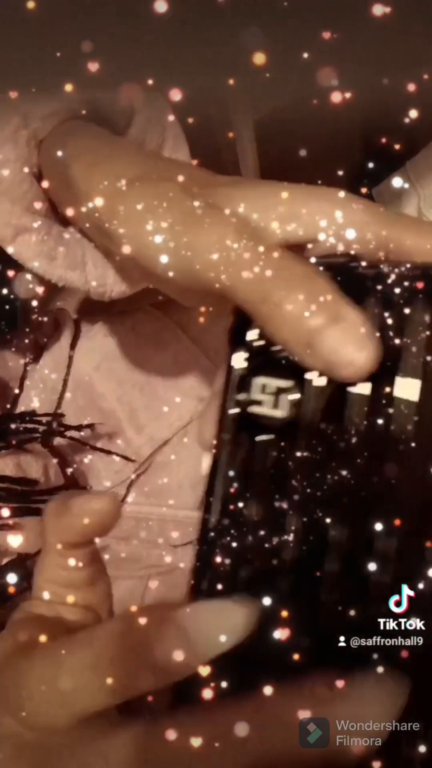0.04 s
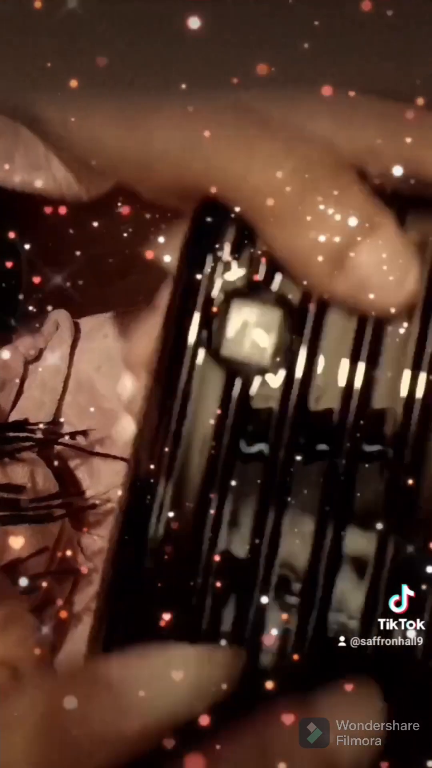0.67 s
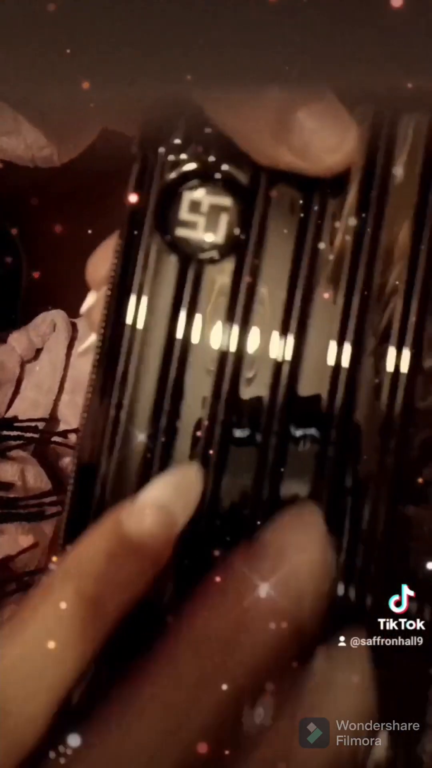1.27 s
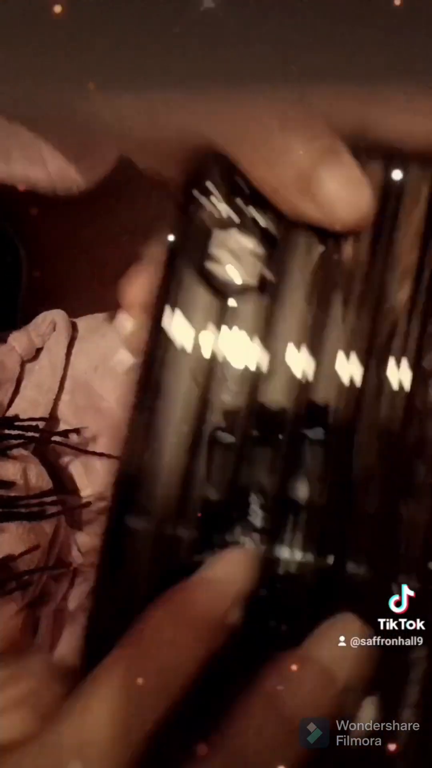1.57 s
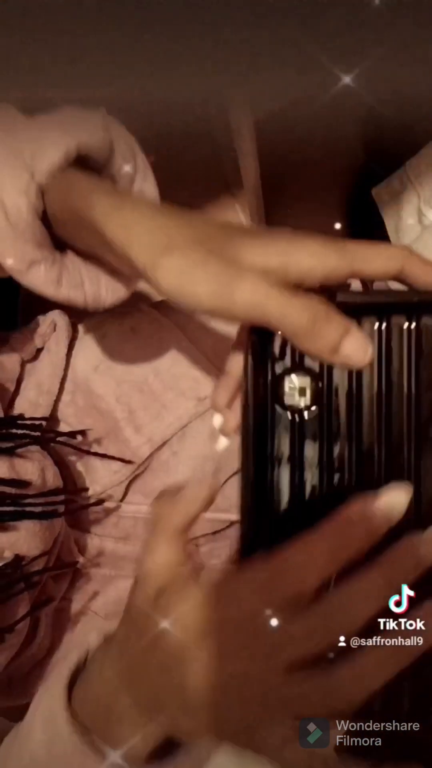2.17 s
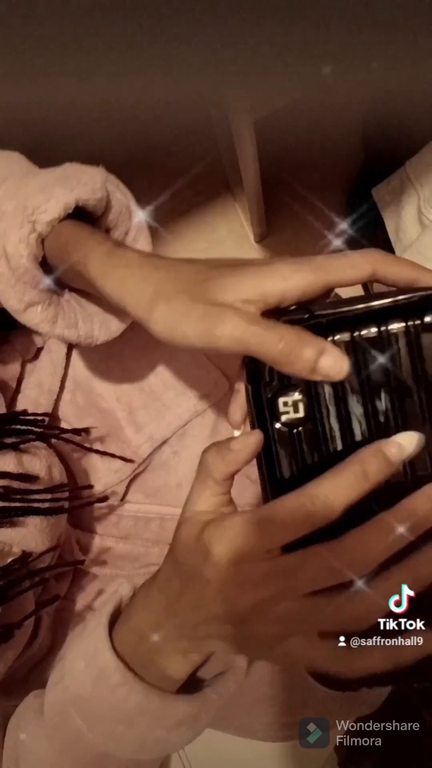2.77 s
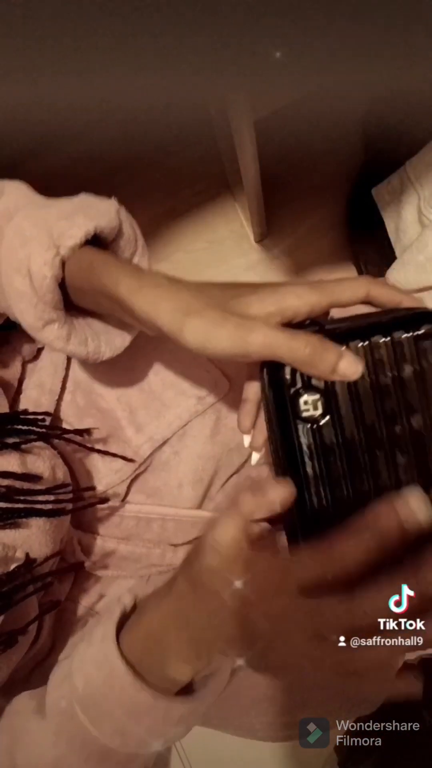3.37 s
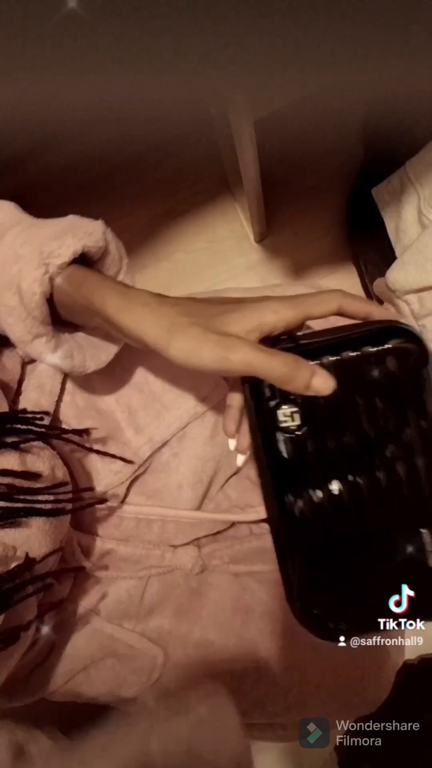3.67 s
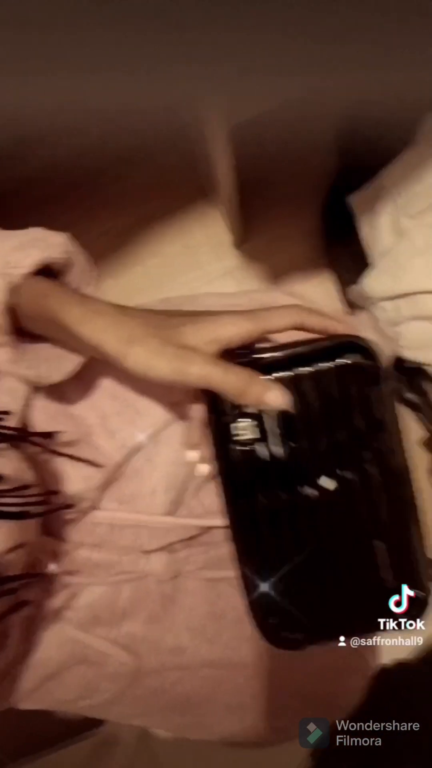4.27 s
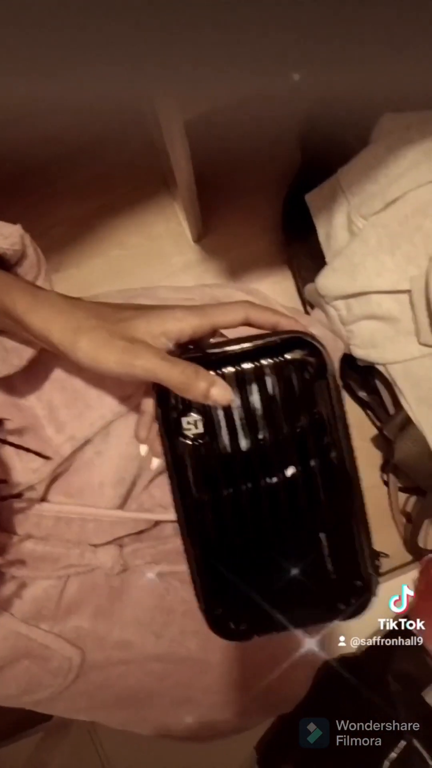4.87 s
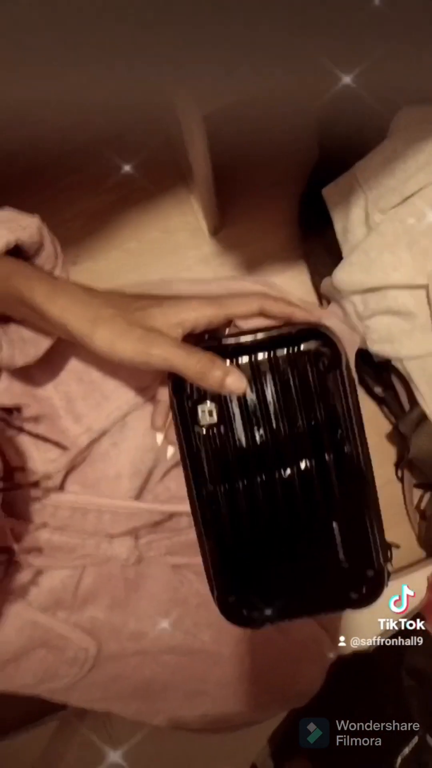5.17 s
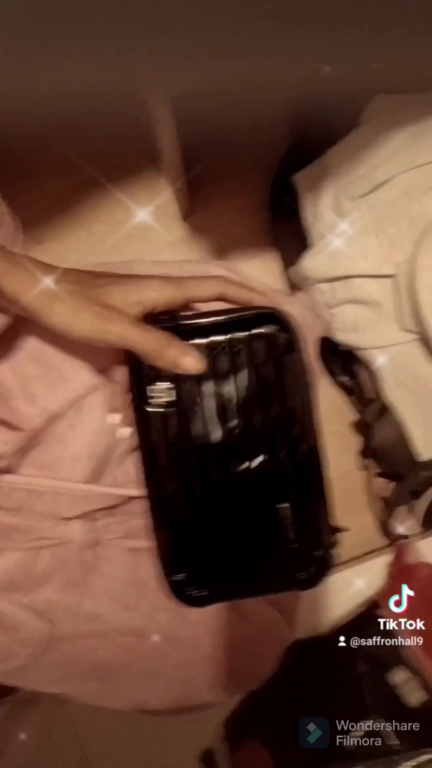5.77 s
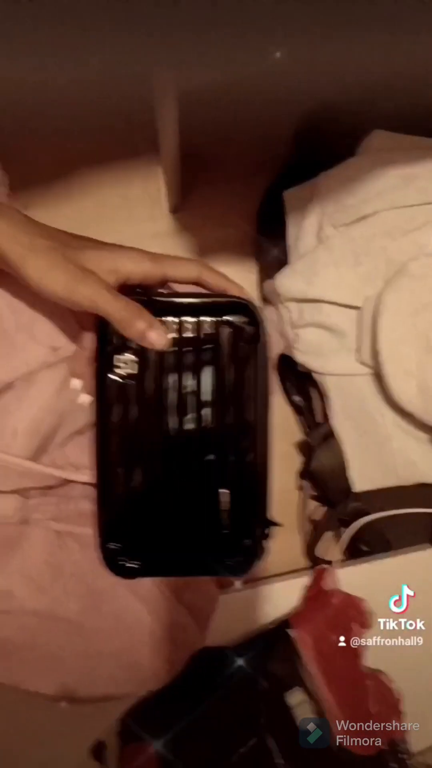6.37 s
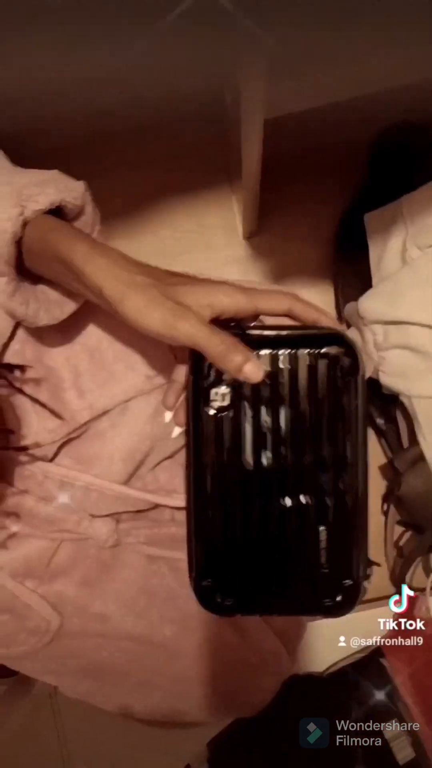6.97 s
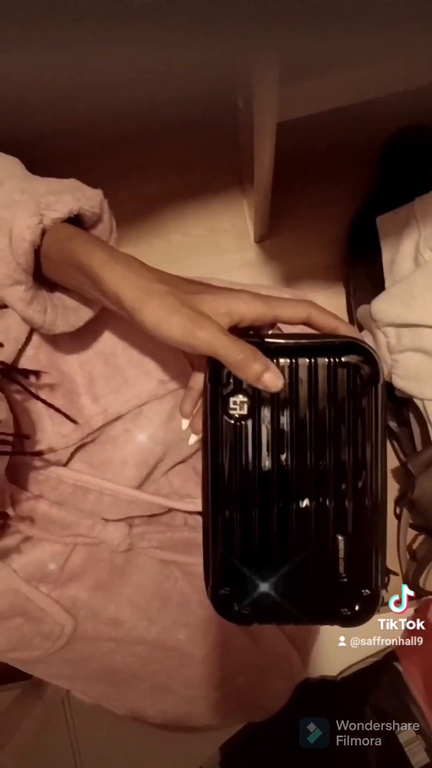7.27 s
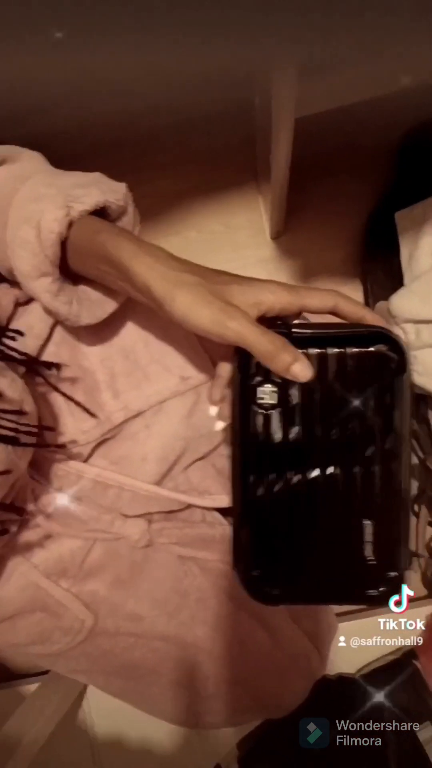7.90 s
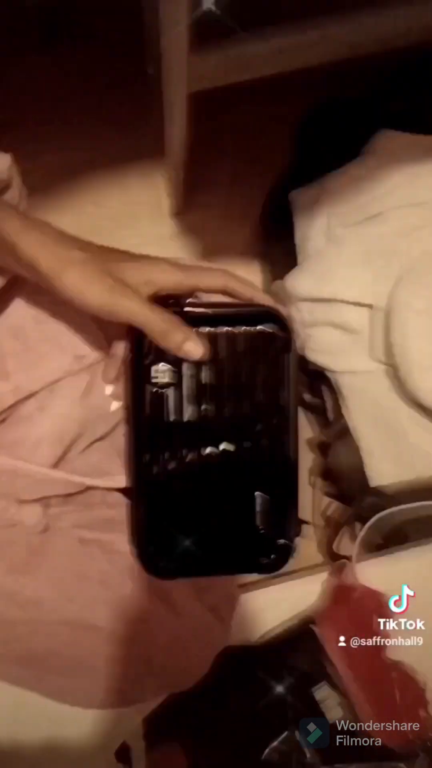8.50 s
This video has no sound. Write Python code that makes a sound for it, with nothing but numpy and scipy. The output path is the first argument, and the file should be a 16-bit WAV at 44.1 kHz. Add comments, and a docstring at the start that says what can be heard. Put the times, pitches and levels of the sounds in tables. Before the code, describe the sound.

Long fingernails tap sharply on a small ribbed plastic case, then it knocks, rubs and creaks in the hand as fabric swishes.

```python
"""Close to a phone in a small, soft room, long fingernails tap the ribbed lid of a small hard plastic case
while skin brushes over it. Each impact excites a thump of the cavity, a clack of the shell and a click.
After four seconds one hand shifts its grip: the case knocks, rubs and creaks by stick-slip friction,
and a fingertip squeaks once. At eight seconds fabric swishes past, and a few last knocks follow.
Throughout, the handling sends a dull rumble through the body of the phone."""
import sys
import numpy as np
from scipy import signal
from scipy.fft import rfft, irfft
from scipy.io import wavfile
from scipy.ndimage import uniform_filter1d

SR = 44100
rng = np.random.default_rng(int(sys.argv[2]) if len(sys.argv) > 2 else 0)


def put_to_file(sound):
    """Save the sound as 16-bit audio at rate SR, in the file named by the first command-line argument."""
    columns = np.atleast_2d(sound).T  # one column per channel
    safe = np.clip(columns, -1, 1)
    whole_steps = np.round(safe * 32767)
    wavfile.write(sys.argv[1], SR, whole_steps.astype(np.int16))


N = 381024
TIME = np.arange(N) / SR
HIT_SIZE = 8192  # samples in one impulse response
THUMP_TOP_HZ, CLACK_TOP_HZ, TOP_HZ = 900, 4500, 15600

# Spectrum of the background. Each row: frequency in Hz, relative level in dB.
AIR_SPECTRUM = [(15, -30.5), (25, 2), (903, -15), (1180, -17), (2700, -19.5), (3180, -21), (3930, -18.5),
                (7480, -24.5), (8550, -20.5), (15000, -35.5)]
# Resonances heard in each hit: low and middle case modes, plus two high rings near 8.6 and 10.1 kHz.
# Each row: frequency in Hz, bandwidth in Hz, relative peak in dB.
RESONANCES = [(208, 89, -3.5), (282, 31, 9), (359, 40, 1.5), (450.8, 23, 6.5), (729, 120, 4),
              (1050, 89, 0.5), (1920, 84, -10.5), (2270, 350, -8), (3460, 39, -0.5), (6160, 220, -5.5),
              (8590, 340, 3), (10140, 370, 0)]
# Reverberation of the room. Each row: frequency in Hz, time to decay by 60 dB in seconds.
ROOM_DECAY = [(150, 0.24), (400, 0.067), (1100, 0.084), (2800, 0.11), (7000, 0.11), (14000, 0.08)]
# Spectra of skin friction, phone rumble, taps, knocks and cloth friction.
# Each row: frequency in Hz, relative level at the left and at the right in dB.
RUB_SPECTRUM = [(30, -18, -23.5), (120, -11.5, -12), (184, -1.5, -7), (285, -2, -10.5), (405, -11.5, -6),
                (534, -19, -15), (1190, -18.5, -22), (2200, -21.5, -17), (3554, -19.5, -24),
                (5874, -20, -20), (8817, -13.5, -21), (10700, -20.5, -16), (12500, -23, -27.5),
                (15000, -32, -35.5)]
RUMBLE_SPECTRUM = [(20.6, -12, -10.5), (40, -6.5, -6.5), (67, -2.5, -3.5), (111, -7, -13),
                   (166, -20, -18.5), (402, -47.5, -46), (1500, -79.5, -80.5)]
TAP_SPECTRUM = [(60, -26.5, -17.5), (120, -27.5, -16.5), (195, -7, -6), (403, -8, -9), (800, -7.5, -5),
                (1280, -11, -13), (2480, -8, -7), (3500, -6.5, -8.5), (6850, -3.5, -1.5),
                (7200, -0.5, -10.5), (9000, 1, -6), (10200, -8, 4), (11600, -13.5, -1.5),
                (14500, -17.5, -20.5)]
KNOCK_SPECTRUM = [(40, -3, -5), (154, -1, -4.5), (278, -0.5, -3), (650, -3, -4), (860, -16.5, -41),
                  (1340, -10.5, -10), (1810, -13, -23.5), (2600, -14.5, -12), (3200, -10.5, -10),
                  (3980, -18, -6), (5890, -21.5, -27.5), (8540, -18, -17.5), (11060, -27.5, -21.5),
                  (15700, -41.5, -37)]
CLOTH_SPECTRUM = [(101, -9, -9.5), (356, 6, -7), (593, -11.5, -12.5), (710, 1.5, -14), (1080, -3.5, -20.5),
                  (1950, 14, -7), (3500, -1, -15.5), (6220, -13.5, -25), (8900, -3.5, -23),
                  (9840, -10.5, -18), (12440, -18, -33), (15000, -25, -34)]
# Mostly skin sliding on the case. The row at 7.66 s is a low hum dying away after the loud knock at 7.57 s.
# Each row: start and length in seconds, rumble and hiss in dB before trim.
RUBS_AND_HUM = [(.08, 0.016, -67, -64.5), (.35, .07, -62, -63), (.64, 0.025, -66, -54.5),
                (.84, 0.08, -58, -56.5), (1.04, 0.089, -62, -69), (1.27, 0.1, -64, -67),
                (2.85, 0.038, -87, -58.5), (3.5, 0.094, -66, -67), (3.7, 0.031, -63, -49),
                (3.822, 0.039, -70, -60), (3.87, 0.13, -82, -71), (4.03, 0.03, -76, -49.5),
                (4.08, 0.18, -80, -64.5), (4.24, 0.014, -47, -47), (4.29, 0.13, -64, -69.5),
                (4.465, 0.037, -56, -64), (4.6, 0.21, -47.5, -65.5), (4.86, .14, -50.5, -70),
                (5.16, 0.033, -43, -75), (5.27, 0.052, -34.5, -47), (5.655, 0.11, -46.5, -63.5),
                (5.81, .23, -58.5, -69.5), (6.06, 0.22, -46.5, -63.5), (6.17, .17, -47.5, -63),
                (6.37, .11, -39.5, -51), (6.49, 0.12, -48.5, -81), (6.745, 0.054, -47.5, -66),
                (6.93, .18, -56.5, -63.5), (7.335, 0.06, -57.5, -84), (7.49, 0.036, -74, -69),
                (7.57, 0.072, -48.5, -58.5), (7.66, .12, -68, -85)]
# Placement of those sounds. Each row: time in seconds, left minus right in dB.
RUB_BALANCE = [(0, -6.5), (3.4, 1), (3.8, 2.5), (4.2, 12), (4.7, 7.5), (5.3, 0.5), (6.0, 6), (6.7, 8),
               (7.7, 5.5)]
# The hand steadies and regrips the phone. Each row: start and length in seconds, level in dB.
PHONE_GRIPS = [(.12, 1.6, -71), (2.35, 1.6, -71.5), (4.035, .09, -55), (4.2, .55, -59)]
# Nails and fingertips on the lid. Each row: start in seconds, thump, clack and click in dB before trim, thump
# and clack frequencies in Hz, left minus right in dB.
NAIL_TOUCHES = [(.1905, -27.5, -28.5, -23.5, 463, 2090, 0.5), (0.315, -39, -58, -60.5, 212, 970, -7),
                (0.3432, -56.5, -54, -57, 426, 2600, 4), (0.365, -57, -53.5, -84, 805, 2610, -2),
                (0.3969, -56, -52.5, -48, 550, 2580, 5), (0.527, -42.5, -59.5, -64.5, 176, 980, -2.5),
                (0.645, -58.5, -53.5, -53.5, 171, 2570, 11), (0.6715, -55.5, -59.5, -72, 462, 2360, -7),
                (.882, -65.5, -57, -49.5, 457, 2330, 3), (0.9199, -36, -30, -21, 600, 2070, -3),
                (1.0225, -77, -54.5, -55.5, 486, 2060, 6), (1.158, -31.5, -31, -23, 670, 2600, -3),
                (1.334, -36, -29.5, -21.5, 651, 2130, -5), (1.0875, -72.5, -62.5, -56, 320, 2070, 4.5),
                (1.409, -67.5, -59, -55.5, 413, 2120, -4.5),
                (1.5682, -33.5, -31.5, -22.5, 760, 3910, -3.5), (1.706, -34.5, -31.5, -22, 347, 1970, -3),
                (2.0068, -33.5, -31.5, -18.5, 339, 3360, -1), (2.2353, -33.5, -28.5, -24, 352, 2320, -0.5),
                (2.299, -49, -39, -44, 800, 2880, -0.5), (2.3564, -56, -39, -38, 203.4, 3000, 1.5),
                (2.3833, -36, -32, -19, 334, 2650, -1.5), (2.627, -38, -31.5, -24, 191.5, 1654, 0.5),
                (2.7334, -71.5, -48, -43.5, 180, 3980, 0.5), (2.8056, -39.5, -30, -20, 340, 1490, -3.5),
                (3.0769, -41.5, -33.5, -21, 342, 1030, -1), (3.212, -41.5, -31, -20, 303, 2024, -1.5),
                (3.3801, -89.5, -85, -61, 165, 4250, 14.5), (3.7283, -57, -52, -45.5, 440, 970, 3),
                (3.881, -64, -72, -54, 230, 3900, 8.5)]
# Knocks of the gripped case. Each row: start in seconds, thump, clack and click in dB before trim,
# thump frequency in Hz, left minus right in dB.
CASE_KNOCKS = [(4.221, -46, -50.5, -44.5, 754, 16), (4.2501, -37.5, -51.5, -46.5, 287, 11),
               (4.1768, -72, -76, -53.5, 291, 28), (4.4515, -57.5, -57, -48.5, 704, 2),
               (4.704, -31.5, -42, -43.5, 307, 7), (4.7172, -35.5, -30, -28.5, 412, -0.5),
               (4.767, -45, -45, -35, 385, 12), (4.7721, -36, -28.5, -33.5, 280, 0),
               (4.8645, -44, -32.5, -49.5, 203, 2), (4.926, -63, -46, -84, 420, 12),
               (4.957, -31, -41, -46, 303, 6), (4.9906, -44.5, -49.5, -90, 390, 11),
               (5.0058, -58, -50.5, -38, 494, -3.5), (5.273, -37, -40.5, -49, 254, 6),
               (5.2942, -41, -22.5, -27.5, 272, 4.5), (5.32, -37.5, -55, -63, 285.7, 21),
               (5.656, -36.5, -55.5, -58, 280, 8.5), (5.719, -39, -31, -38, 273, 5),
               (5.8278, -60, -49, -48.5, 249, 6), (5.948, -48.5, -57.5, -45, 290, -3),
               (6.056, -37, -37, -41, 280, 8), (6.1831, -36.5, -46, -49.5, 300, 13),
               (6.3598, -31, -39.5, -40, 357, 6), (6.4365, -43, -32, -40, 347, 28),
               (6.4461, -33, -36, -37.5, 322, 4), (6.4768, -33.5, -38.5, -48, 270, 7),
               (6.739, -38.5, -68, -84, 398, -5.5), (6.7529, -51, -51, -93, 208, 16),
               (6.921, -40.5, -54.5, -62, 440, -6), (6.9458, -53, -49.5, -57.5, 257, 1),
               (7.227, -52.5, -84.5, -71, 279, 3), (7.331, -43, -86, -92, 407, 0),
               (7.5354, -53.5, -51, -48.5, 309, 8), (7.5573, -27, -39, -36, 316, 7),
               (7.5691, -26, -37.5, -32.5, 270, -1.5), (8.5219, -48, -52, -71, 706, 25),
               (8.595, -30.5, -28.5, -31.5, 246, 7.5), (8.633, -34.5, -35, -36, 286, -3)]
# Runs of stick-slip jerks. Each row: start in seconds, number of jerks, first period in seconds, ratio of
# each period to the last, mid-run thump, clack and click in dB before trim, thump frequency in Hz,
# left minus right in dB.
CREAK_RUNS = [(4.587, 5, 0.034, 0.72, -43.5, -54, -58, 780, 21.5),
              (5.1426, 3, 0.02, 1.1, -47, -35.5, -66, 394, 6.5),
              (5.814, 3, .029, 1.25, -42, -59.5, -68.5, 298, 16),
              (5.971, 2, 0.044, 1, -42, -58.5, -72, 260, 13),
              (6.222, 4, 0.027, 0.75, -43.5, -64.5, -69, 279, 6),
              (6.511, 4, 0.025, 0.92, -41, -69, -74, 300, 2)]
# Fabric brushing by. Each row: start and length in seconds, rumble and hiss in dB before trim.
CLOTH_STROKES = [(8.025, 0.052, -71.5, -62), (8.1, 0.098, -68, -68), (8.155, 0.043, -47.5, -48),
                 (8.26, 0.1, -47, -50), (8.315, 0.047, -40, -43), (8.398, 0.067, -46.5, -39.5),
                 (8.445, 0.05, -37.5, -66), (8.595, 0.055, -40, -41.5)]


def undb(db):
    """Decibels to amplitude ratio."""
    return 10 ** (np.asarray(db) / 20)


def unit(x):
    """Normalisation to an rms of 1."""
    return x / np.sqrt(np.mean(x ** 2))


def sides(pan_db):
    """Constant-power panning: left and right gains that differ by pan_db."""
    gains = undb(np.array([pan_db, -pan_db]) / 2).reshape(2, -1)
    return gains / np.sqrt(np.mean(gains ** 2, axis=0))


def add(out, x, s):
    """Superposition: add x to out, starting at s seconds."""
    i = max(0, int(round(s * SR)))
    out[:, i:i + x.shape[1]] += x[:, :max(0, N - i)]


def response(points, size):
    """Minimum-phase response through (Hz, dB, ..) points, one row for each dB column."""
    hz, *columns = np.transpose(points)
    f = np.maximum(np.fft.rfftfreq(size, 1 / SR), 1)
    cepstrum = irfft(np.log(undb([np.interp(np.log(f), np.log(hz), c) for c in columns])), size)
    cepstrum[:, 1:size // 2] *= 2  # folding onto positive time makes the filter causal
    cepstrum[:, size // 2 + 1:] = 0
    return np.exp(rfft(cepstrum))


def coloured_noise(spectrum):
    """Spectral shaping of white noise, independent at each side, to an rms of 1."""
    return unit(irfft(rfft(rng.standard_normal((2, N))) * response(spectrum, N), N))


def air(level_db):
    """The noise floor: faint, steady room rumble and microphone hiss."""
    return undb(level_db) * coloured_noise(AIR_SPECTRUM)


def resonance(size, hz, width_hz):
    """Frequency response of a damped oscillator, with gain 1 at its centre."""
    f = np.maximum(np.fft.rfftfreq(size, 1 / SR), 1)
    return 1 / (1 + 1j * hz / width_hz * (f / hz - hz / f))


def ringing(size, ring_db):
    """Superposition of the direct push, the low and middle case modes and two high rings."""
    return 1 + sum(undb(db + ring_db) * resonance(size, hz, width) for hz, width, db in RESONANCES)


def spot(size, spread_db, count=90):
    """Modal coupling depends on position: each spot favours a random set of the higher modes."""
    hz = np.linspace(np.sqrt(THUMP_TOP_HZ / 2), np.sqrt(TOP_HZ), count) ** 2
    db = spread_db * np.clip(rng.standard_normal(count), -2, 2)
    db[0] = 0
    return response(np.column_stack([hz, db]), size)


def registers(x):
    """Band splitting into the lows of the cavity, the mids of the shell and the treble of the contact."""
    bands = [(THUMP_TOP_HZ, "low"), ([THUMP_TOP_HZ, CLACK_TOP_HZ], "band"), (CLACK_TOP_HZ, "high")]
    return [signal.sosfilt(signal.butter(3, hz, kind, fs=SR, output="sos"), x) for hz, kind in bands]


def wander(rate_hz):
    """Smoothing turns white noise into a slow fluctuation with an rms of 1."""
    width = int(SR / rate_hz)
    return unit(uniform_filter1d(uniform_filter1d(rng.standard_normal(N), width), width))


def friction(slips_per_s, spread_db, smooth_db, flutter_db, spot_db, size=4096):
    """Sliding friction: tiny random slips and fibre noise, under a pressure that flutters and moves."""
    slips = (rng.random(N) < slips_per_s / SR) * rng.standard_normal(N)
    slips *= undb(spread_db * np.minimum(rng.exponential(size=N), 4))
    drive = unit(slips) + undb(smooth_db) * rng.standard_normal((2, N))
    out, fade = np.zeros((2, N)), np.sqrt(np.hanning(size))
    for i in range(0, N, size // 2):  # cross-fade from spot to spot
        modes = spot(size, spot_db)
        modes /= np.sqrt(np.mean(abs(modes) ** 2))
        add(out, fade * irfft(rfft(drive[:, i:i + size], size) * modes), i / SR)
    return out * undb(flutter_db * wander(rate_hz=40))


def strokes(rows, attack_s, release_s):
    """Incoherent strokes rise, hold, decay and add in power; one gain curve for each dB column."""
    power = np.zeros((len(rows[0]) - 2, N))
    for s, length_s, *levels_db in rows:
        t = np.arange(int((length_s + 10 * release_s) * SR)) / SR
        shape = (1 - np.exp(-(t / attack_s) ** 2)) * np.exp(-np.maximum(t - length_s, 0) / release_s)
        add(power, np.outer(undb(levels_db), shape) ** 2, s)
    return np.sqrt(power)


def slide(drive, spectrum, gains, ring_db, rasp_db):
    """Forced vibration: the rumble follows one gain, the mid rasp and the hiss the other."""
    impulse_response = irfft(response(spectrum, HIT_SIZE) * ringing(HIT_SIZE, ring_db))
    body = signal.oaconvolve(drive, impulse_response, axes=1)[:, :N]
    low, mid, high = (unit(part) for part in registers(body))
    rumble, hiss = gains
    return rumble * low + hiss * (undb(rasp_db) * mid + high)


def rubbing(trim_db):
    """Friction of skin on the ribs drives the cavity; the same noise gives a dying hum."""
    drive = friction(slips_per_s=670, spread_db=3, smooth_db=0.5, flutter_db=3.5, spot_db=7.5)
    gains = undb(trim_db) * strokes(RUBS_AND_HUM, attack_s=0.004, release_s=0.018)
    pan_db = np.interp(TIME, *np.transpose(RUB_BALANCE))
    return slide(drive, RUB_SPECTRUM, gains, ring_db=-7, rasp_db=-0.5) * sides(pan_db)


def phone_rumble(handled):
    """Structure-borne sound: the phone rumbles when regripped and as each push on the case rocks it."""
    settle_s, rock_db, at_thump_db, db_per_db = 0.0083, -50.5, -41.5, 0.92
    keep = np.exp(-1 / (settle_s * SR))
    low_power = np.mean(registers(handled)[0] ** 2, axis=0)
    thump = np.sqrt(signal.lfilter([1 - keep], [1, -keep], low_power))
    rocking = undb(rock_db) * (thump / undb(at_thump_db)) ** db_per_db
    gripping = strokes(PHONE_GRIPS, attack_s=0.0038, release_s=0.04)
    return coloured_noise(RUMBLE_SPECTRUM) * np.hypot(rocking, gripping)


def room(onset_s):
    """Diffuse reverberation: a noise tail of unit energy, decaying at its own rate in each band."""
    t = np.arange(HIT_SIZE) / SR
    log_f = np.log(np.maximum(np.fft.rfftfreq(HIT_SIZE, 1 / SR), 1))
    hz, t60s = np.transpose(ROOM_DECAY)
    noise = rfft(rng.standard_normal((2, HIT_SIZE)))
    tail = sum(irfft(noise * np.interp(log_f, np.log(hz), band)) * np.exp(-np.log(1000) * t / t60)
               for band, t60 in zip(np.eye(len(hz)), t60s))
    return unit(tail * (1 - np.exp(-(t / onset_s) ** 2))) / np.sqrt(HIT_SIZE)


def contact(lag_ms, rise_s, decay_s, shell_db, side_db, echo_ms, echo_db, room_db):
    """Spectrum of an impact: a sharp push, the shell's dense ring, an early reflection and the room."""
    t = np.arange(HIT_SIZE) / SR
    f = np.fft.rfftfreq(HIT_SIZE, 1 / SR)
    # the shell radiates differently towards each microphone
    ring = rng.standard_normal(HIT_SIZE) + undb(side_db) * rng.standard_normal((2, HIT_SIZE))
    envelope = (1 - np.exp(-t / rise_s)) * np.exp(-t / decay_s)
    direct = undb(shell_db) * unit(ring * envelope) / np.sqrt(HIT_SIZE)
    echo_s = echo_ms / 1000 * rng.uniform(0.8, 1.25, (2, 1))
    echo = undb(echo_db) * rfft(direct) * np.exp(-2j * np.pi * f * echo_s)
    direct[:, 0] -= 1  # the push
    tail = undb(room_db) * rfft(room(onset_s=0.0025))
    lag_s = np.array([[max(lag_ms, 0)], [max(-lag_ms, 0)]]) / 1000  # a positive lag delays the left
    return (rfft(direct) + echo + tail) * np.exp(-2j * np.pi * f * lag_s)


def struck(thump_hz, clack_hz, thump_width_hz, thump_db, clack_q, clack_db):
    """Resonance of the cavity mode and the shell mode that a blow excites most."""
    return ((1 + undb(thump_db) * resonance(HIT_SIZE, thump_hz, thump_width_hz))
            * (1 + undb(clack_db) * resonance(HIT_SIZE, clack_hz, clack_hz / clack_q)))


def blow(spectrum, levels_db, pan_db, corner_hz=600):
    """Spectral tilt brings a blow's first 20 ms towards its thump, clack and click; panning places it."""
    head = int(0.02 * SR)
    fade = signal.windows.tukey(2 * head, 0.2)[head:]
    register = np.digitize(np.fft.rfftfreq(head, 1 / SR), [THUMP_TOP_HZ, CLACK_TOP_HZ])
    for _ in range(3):
        onset = irfft(spectrum)[:, :head] * fade
        power = np.mean(abs(rfft(onset)) ** 2, axis=0) * 2 / head ** 2
        thump, clack, click = levels_db - 10 * np.log10(np.bincount(register, power))
        tilt = [(corner_hz, thump), (corner_hz * 2, clack), (3300, clack), (6000, click)]
        spectrum = spectrum * response(tilt, HIT_SIZE)
    x = irfft(spectrum) * signal.windows.tukey(2 * HIT_SIZE, 0.2)[HIT_SIZE:]
    return x * sides(pan_db) * np.std(x) / np.std(x, axis=1, keepdims=True)


def nail_taps(trim_db, firm_db):
    """Impulsive excitation: hard, short contacts ring the lid."""
    out, colour = np.zeros((2, N)), response(TAP_SPECTRUM, HIT_SIZE) * ringing(HIT_SIZE, ring_db=-12)
    for s, *levels_db, thump_hz, clack_hz, pan_db in NAIL_TOUCHES:
        levels_db = np.add(levels_db, trim_db)
        if max(levels_db) > firm_db:
            # a firm tap is nearly all crack, as the finger damps the lid
            hit = contact(lag_ms=1.066, rise_s=0.0001, decay_s=0.0016, shell_db=5, side_db=-6,
                          echo_ms=5, echo_db=-11, room_db=-3.5)
            ring = struck(thump_hz, clack_hz, thump_width_hz=98, thump_db=-1, clack_q=4.4, clack_db=-10)
            add(out, blow(hit * colour * ring * spot(HIT_SIZE, spread_db=1.15), levels_db, pan_db), s)
            # the nail then settles on the next rib with a light touch
            s += rng.normal(0.051, 0.006)
            levels_db -= 34.5
        # a light touch drags a little and leaves single modes ringing
        hit = contact(lag_ms=0.98, rise_s=0.001, decay_s=0.0034, shell_db=7, side_db=-4.5,
                      echo_ms=4.6, echo_db=-14, room_db=2)
        ring = struck(thump_hz, clack_hz, thump_width_hz=96, thump_db=8.5, clack_q=9, clack_db=4)
        add(out, blow(hit * colour * ring * spot(HIT_SIZE, spread_db=5), levels_db, pan_db), s)
    return out


def jerk(levels_db, thump_hz, pan_db, clack_hz, lag_ms):
    """One give of the gripped shell: a softer contact lasts longer, so dull goes with slow and round."""
    thump, clack, click = levels_db
    soft = np.clip((thump - max(clack, click)) / 38.5, 0, 1)  # 1 is a wholly soft push of the palm
    hit = contact(lag_ms, rise_s=0.0008 + 0.011 * soft, decay_s=0.0014 + 0.0042 * soft,
                  shell_db=9 + 2.7 * soft, side_db=5.5, echo_ms=6.6, echo_db=-16, room_db=-8.5)
    colour = response(KNOCK_SPECTRUM, HIT_SIZE) * ringing(HIT_SIZE, ring_db=-1.5)
    ring = struck(thump_hz, clack_hz, thump_width_hz=51, thump_db=8.5, clack_q=3.3, clack_db=-4)
    return blow(hit * colour * ring * spot(HIT_SIZE, spread_db=2.5), levels_db, pan_db, corner_hz=459)


def knocks(trim_db):
    """Cavity resonance: the case booms each time its shell gives under the grip."""
    out = np.zeros((2, N))
    for s, *levels_db, thump_hz, pan_db in CASE_KNOCKS:
        lag_ms = rng.normal(0.97, 0.18)
        add(out, jerk(np.add(levels_db, trim_db), thump_hz, pan_db, clack_hz=2300, lag_ms=lag_ms), s)
    return out


def creaks(trim_db, edge_db):
    """Stick-slip motion: the gripped shell yields in runs of small jerks, strongest in mid-run."""
    out = np.zeros((2, N))
    for s, jerks, period_s, ratio, *levels_db, thump_hz, pan_db in CREAK_RUNS:
        for place in np.linspace(-1, 1, jerks):
            swell_db = np.add(levels_db, trim_db) + edge_db * place ** 2
            add(out, jerk(swell_db, thump_hz, pan_db, clack_hz=1780, lag_ms=0.062), s)
            s, period_s = s + period_s, period_s * ratio
    return out


def squeak(peak_s, hz, half_length_s, db, roughness, pan_db):
    """Stick-slip oscillation of a fingertip on the gloss: one short, slightly rough whistle."""
    waver = unit(uniform_filter1d(rng.standard_normal(N), size=30))
    tone = np.sin(2 * np.pi * np.cumsum(hz * (1 + roughness * waver)) / SR)
    envelope = np.exp(-((TIME - peak_s) / half_length_s) ** 2)
    return unit(tone) * undb(db) * envelope * sides(pan_db)


def fabric(trim_db):
    """Fibre friction: cloth brushes past on the left in a few soft strokes."""
    drive = friction(slips_per_s=1200, spread_db=2.5, smooth_db=4.5, flutter_db=3, spot_db=4.5)
    gains = undb(trim_db) * strokes(CLOTH_STROKES, attack_s=0.01, release_s=0.027)
    return slide(drive, CLOTH_SPECTRUM, gains, ring_db=-34, rasp_db=-1.5)


def scene():
    """Superposition of taps, handling and rumble over the noise floor of the room."""
    taps = nail_taps(trim_db=[-0.5, 0, 0], firm_db=-30)  # trims: thump, clack, click
    grip_trim_db = [-1, -0.5, -0.5]
    handled = knocks(grip_trim_db) + creaks(grip_trim_db, edge_db=-2.5)
    handled += rubbing(trim_db=-2) + fabric(trim_db=-0.5)
    rumble = phone_rumble(handled)
    finger = squeak(peak_s=5.259, hz=3350, half_length_s=0.008, db=-31.5, roughness=0.045, pan_db=6)
    return taps + handled + rumble + finger + air(level_db=-72)


def record(dry):
    """Clipping and band limiting: the phone clips at full scale and cuts the highest treble."""
    low_pass = signal.ellip(8, 0.2, 70, TOP_HZ, fs=SR, output="sos")
    return signal.sosfilt(low_pass, np.clip(dry, -1, 1))


dry = scene()
out = record(dry)
put_to_file(out)
```